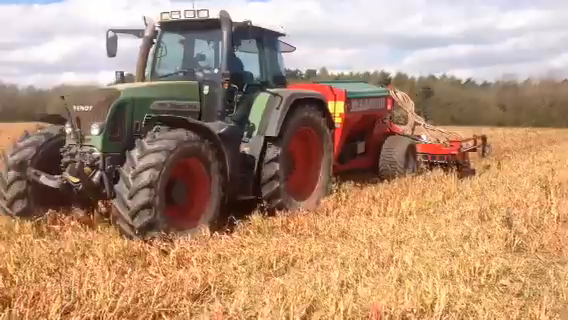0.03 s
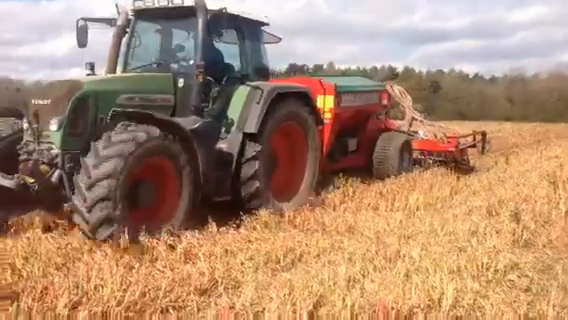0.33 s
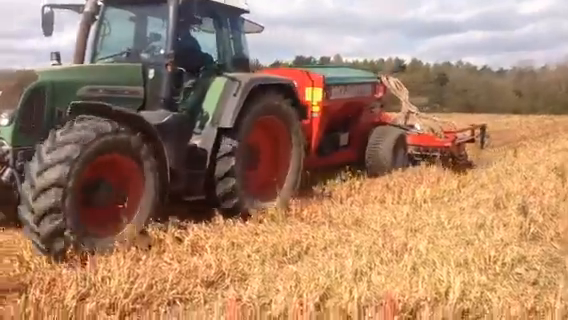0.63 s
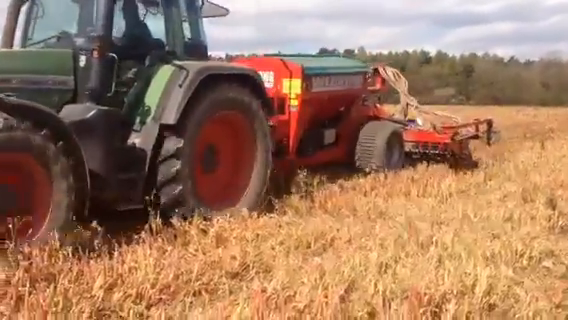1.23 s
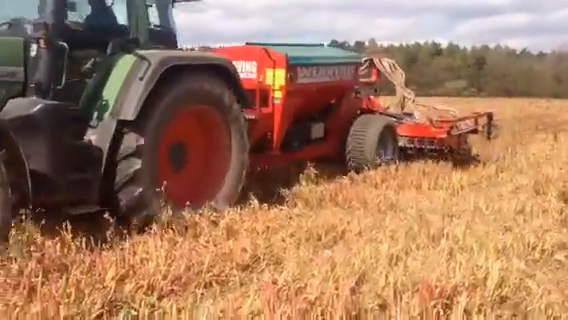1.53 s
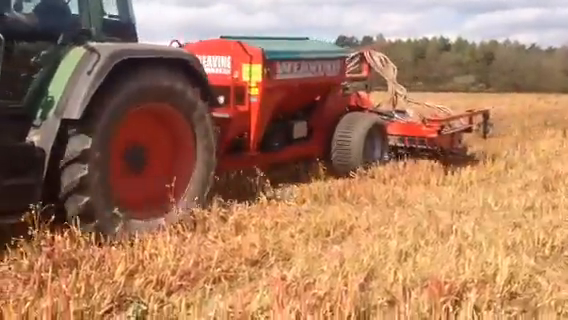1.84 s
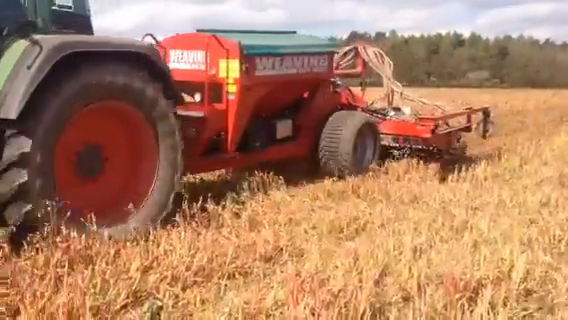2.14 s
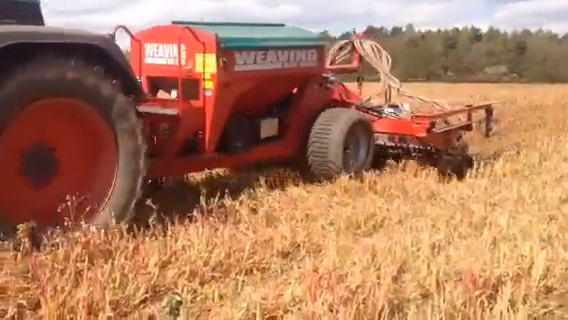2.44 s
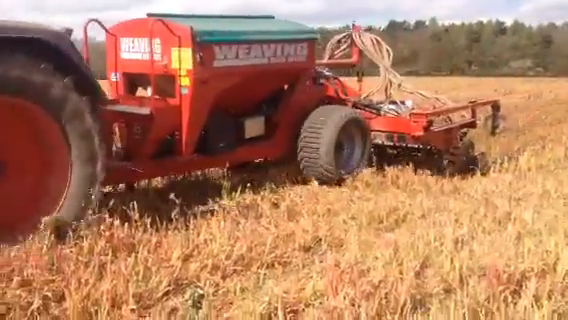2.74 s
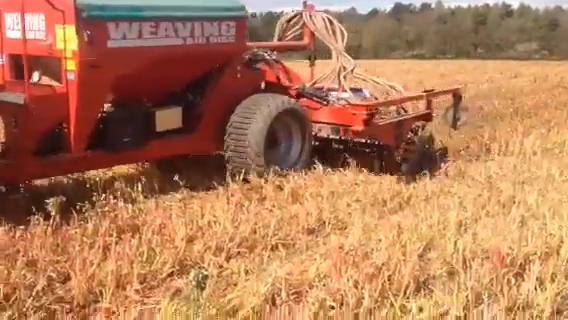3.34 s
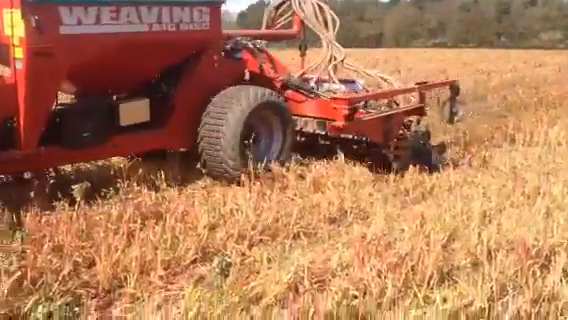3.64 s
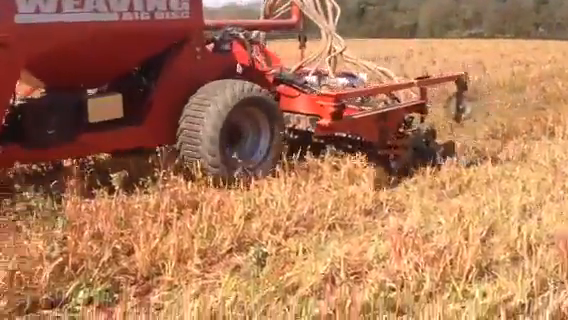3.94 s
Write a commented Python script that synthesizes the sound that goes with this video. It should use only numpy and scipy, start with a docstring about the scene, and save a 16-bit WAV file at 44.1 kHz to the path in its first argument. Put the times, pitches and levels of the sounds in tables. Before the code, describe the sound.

A tractor and seed drill pass close by, engine droning under a growing bright hiss.

```python
"""A bright, grainy hiss grows over a droning, clattering engine: a six-cylinder tractor tows a
pneumatic seed drill close past, through stubble. The hiss is seed blown by the drill's fan through
resonant pipes; the drone is a harmonic series on the engine's firing rate. Straw crackles and snaps,
the wheels rumble, and friction with the soil makes the steel discs sing faintly."""
import sys
import numpy as np
from scipy.fft import rfft, irfft, next_fast_len
from scipy.io import wavfile
from scipy.ndimage import map_coordinates

SR = 44100
rng = np.random.default_rng(int(sys.argv[2]) if len(sys.argv) > 2 else 0)


def dump_mix(stems):
    """Bounce the given channels to the path in sys.argv[1] as a 16-bit WAV at rate SR."""
    frames = np.atleast_2d(stems).T  # one column per channel
    limited = np.clip(frames, -1, 1)  # hard clip at full scale
    pcm = np.round(limited * 32767).astype(np.int16)
    wavfile.write(sys.argv[1], SR, pcm)


N = 176400
TIME_S = np.arange(N) / SR


def amp(db):
    """Decibels to amplitude ratio."""
    return 10 ** (np.asarray(db) / 20)


def unit(x):
    """Normalisation to rms 1."""
    return x / np.sqrt(np.mean(x ** 2) + 1e-20)


def curves(rows):
    """Linear interpolation in time: one curve for each column after the first."""
    times, *columns = np.transpose(rows)
    return [np.interp(TIME_S, times, column) for column in columns]


def noise():
    """Gaussian white noise."""
    return rng.standard_normal(N)


def wobble(knots_per_s):
    """Smooth random modulation: a spline through Gaussian values."""
    return map_coordinates(rng.standard_normal(4096), [TIME_S * knots_per_s + 4], mode="wrap")


def filtered(x, response):
    """Linear filtering: the spectrum is multiplied by a frequency response."""
    size = next_fast_len(N + 8192)
    return irfft(rfft(x, size) * response(np.fft.rfftfreq(size, 1 / SR)), size)[:N]


def coloured(x, spectrum):
    """Spectral shaping by (frequency_hz, gain_db) points, at rms 1."""
    points_hz, gain_db = np.transpose(spectrum)
    return unit(filtered(x, lambda hz: amp(np.interp(np.log(hz + 1), np.log(points_hz), gain_db))))


def grains(hits_per_s, spread_db, share):
    """Shot noise: tiny uneven impacts carry a share of the power of a white hiss."""
    hits = (rng.random(N) < hits_per_s / SR) * np.sign(noise())
    sizes = amp(spread_db * np.clip(noise(), -2, 2))
    return np.sqrt(share) * unit(hits * sizes) + np.sqrt(1 - share) * noise()


def pings(hits_per_s=300, attack_s=.002, decay_s=.035, level_db=-11.5):
    """Damped free vibration: grit and seed ring the steelwork at scattered pitches."""
    t = np.arange(SR // 6) / SR
    envelope = np.exp(-t / decay_s) * (1 - np.exp(-t / attack_s))
    ringing = np.zeros(N + SR)
    for when, pitch, size in rng.random((hits_per_s * N // SR, 3)):
        hz = 900 + 14000 * pitch ** 1.3
        start = int(when * N)
        ringing[start:start + len(t)] += (.5 + size) * envelope * np.sin(2 * np.pi * hz * t)
    return amp(level_db) * unit(ringing[:N])


def singing(pitch_hz, width_hz):
    """A randomly driven mode gives narrowband noise: an unsteady tone of rms 1."""
    envelope = wobble(width_hz) + 1j * wobble(width_hz)
    return unit(np.real(envelope * np.exp(2j * np.pi * pitch_hz * TIME_S)))


# Resonance of the seed pipes: pitch_hz, width_hz, gain_db
PIPE_MODES = [(5182, 686, 0)]
# Broad band around that resonance: frequency_hz, gain_db
PIPE_SPECTRUM = [(1000, -30), (2500, -5), (4000, -1), (5200, -1), (6400, -0.5), (8000, -5.5), (14000, -18)]


def pipe_resonance(x):
    """The pipes act as a damped resonator, favouring a bright band; the result has rms 1."""
    def response(f):
        return sum(amp(db) * 1j * f * width / (hz ** 2 - f ** 2 + 1j * f * width)
                   for hz, width, db in PIPE_MODES)
    return coloured(filtered(x, response), PIPE_SPECTRUM)


# Pipe hiss, growing as the drill nears: time_s, level_db
HISS_LEVEL = [(.1, -25), (.29, -24.2), (.39, -21.8), (.53, -21.8), (.58, -23.4), (.72, -22.4),
              (1.15, -22.4), (1.32, -20.5), (1.44, -20.9), (1.56, -19.3), (1.7, -20.4), (1.87, -20.1),
              (1.94, -17.6), (2.04, -20.3), (2.28, -19.1), (2.55, -18.4), (2.76, -15.7), (2.88, -18.2),
              (3.25, -18.2), (3.37, -16.7), (3.47, -17.8), (3.58, -16.9), (3.76, -18.2), (3.96, -16.7)]


def seed_pipes(surge_db, gain_db=.08, flutter_db=.6):
    """Broadband excitation: rushing air and rattling seed drive the pipe resonance."""
    level_db, = curves(HISS_LEVEL)
    seeds = grains(hits_per_s=3900, spread_db=3.5, share=.49) + pings()
    return amp(level_db + gain_db + surge_db + flutter_db * wobble(70)) * pipe_resonance(seeds)


# Stalks under the drill: time_s, crackle_db, rush_db
STUBBLE_LEVELS = [(0.1, -33.3, -35.7), (.45, -30.8, -35.6), (.62, -31.8, -35.6), (.95, -29.8, -33.8),
                  (1.15, -29.6, -34.2), (1.55, -26.6, -32.9), (1.75, -28.7, -32.9), (2.15, -27.3, -32.4),
                  (2.4, -25.8, -31.5), (2.62, -24, -29.6), (2.95, -26, -30.7), (3.3, -25.2, -30.3),
                  (4, -24.2, -29.8)]
# Treble crackle of dry straw: frequency_hz, gain_db
STRAW_SPECTRUM = [(60, -68), (2000, -16.5), (5000, -1.5), (7000, -1), (8300, -0.5), (9300, 0.5), (10400, 0),
                  (11300, -3), (12300, -4), (13200, -6.5), (14000, -5), (15200, -6)]
# Midrange rush: frequency_hz, gain_db
RUSH_SPECTRUM = [(60, -60), (500, -36), (1200, -5.5), (1500, 0), (2200, 0), (3000, -1), (4000, -0.5),
                 (6000, -24), (12000, -29)]


def stubble(surge_db, crackle_gain_db=1.36, rush_gain_db=-.35):
    """Superposed impulses from many dry stalks merge into a crackle over a broad rush."""
    crackle_db, rush_db = curves(STUBBLE_LEVELS)
    stalks = amp(surge_db) * grains(hits_per_s=3000, spread_db=4, share=.42) + pings()
    crackle = amp(crackle_db + crackle_gain_db) * coloured(stalks, STRAW_SPECTRUM)
    rush = amp(rush_db + rush_gain_db) * coloured(stalks, RUSH_SPECTRUM)
    return crackle + rush


# Single strikes of straw and grit: start_s, peak_db
STRIKES = [(0.4534, -13), (0.5347, -5), (0.604, -5.5), (0.6998, -13), (0.8205, -14), (0.9123, -12),
           (1.3234, -5), (1.5379, -3), (1.8494, -2), (1.9414, -6), (1.9719, -5), (2.6304, -1), (2.772, -3),
           (3.5708, -5.5)]


def snaps(gain_db=-12, t60_s=.025, crack_db=-7):
    """Impact transients: each strike on the drill is a noise burst with exponential decay."""
    envelope = sum((TIME_S >= start_s) * amp(peak_db - 60 * np.abs(TIME_S - start_s) / t60_s)
                   for start_s, peak_db in STRIKES)
    burst = pipe_resonance(noise()) + amp(crack_db) * coloured(noise(), STRAW_SPECTRUM)
    return amp(gain_db) * envelope * burst


# Cylinder firings: time_s, rate_hz
FIRING_RATE = [(0, 81.0), (1, 80.7), (2, 80.5), (4, 80.6)]
# Fundamental at the firing rate: time_s, level_db
THRUM_LEVEL = [(0.1, -57), (1.3, -59), (2.2, -61), (4, -66)]
# Exhaust overtones together: time_s, level_db
DRONE_LEVEL = [(0.1, -37), (.38, -33), (.95, -36.5), (1.6, -34), (1.92, -35.5), (2.12, -31.5), (2.4, -29.5),
               (2.7, -32.5), (3.15, -35.5), (3.45, -42), (4, -44)]
# Exhaust overtones: firing_multiple, level_db
EXHAUST_HARMONICS = [(2, -13), (3, 1.5), (4, -18), (6, -15)]
# Engine noise: time_s, roar_db, clatter_db
ENGINE_LEVELS = [(0.1, -37, -35), (.85, -37.5, -35.5), (1.3, -35.5, -33.5), (1.85, -35, -32.5),
                 (2.2, -37, -31.5), (2.8, -35.5, -32.5), (3.4, -35.5, -31.5), (4, -36, -32.5)]
# Low engine roar: frequency_hz, gain_db
ROAR_SPECTRUM = [(40, -65), (100, -37), (180, -14), (275, -2), (320, -3), (380, -5), (420, -16.5),
                 (600, -14.5), (1500, -45)]
# Midrange engine clatter: frequency_hz, gain_db
CLATTER_SPECTRUM = [(60, -65), (250, -38), (450, -6), (560, -2), (680, 1), (950, -2.5), (1100, -4.5),
                    (1300, -10.5), (2500, -16), (6000, -46)]


def engine(drone_gain_db=-1, clatter_gain_db=.5, throb_db=.6, flutter_db=1.35, waver_rad=.1):
    """Periodic firing makes exhaust harmonics and modulates the amplitude of roar and clatter."""
    firing_hz, = curves(FIRING_RATE)
    thrum_db, = curves(THRUM_LEVEL)
    drone_db, = curves(DRONE_LEVEL)
    roar_db, clatter_db = curves(ENGINE_LEVELS)
    phase = 2 * np.pi * np.cumsum(firing_hz) / SR
    harmonics = np.zeros(N)
    for multiple, level_db in EXHAUST_HARMONICS:
        gain = amp(level_db + flutter_db * wobble(14))
        offset = waver_rad * wobble(22) + 2 * np.pi * rng.random()
        harmonics += gain * np.sin(multiple * phase + offset)
    thrum = amp(thrum_db) * np.sin(phase)
    drone = amp(drone_db + drone_gain_db) * unit(harmonics)
    throb = amp(throb_db * np.cos(phase))
    roar = amp(roar_db) * coloured(noise() * throb, ROAR_SPECTRUM)
    clatter = amp(clatter_db + clatter_gain_db) * coloured(noise() * throb, CLATTER_SPECTRUM)
    return thrum + drone + roar + clatter


# Rolling wheels: time_s, level_db
RUMBLE_LEVEL = [(0.1, -37.5), (.8, -36.5), (1.1, -38.5), (1.6, -37.5), (2.3, -35.5), (2.8, -34.5),
                (3.4, -34.5), (3.65, -30), (4, -33.5)]
# Rumble of tyres and frame: frequency_hz, gain_db
RUMBLE_SPECTRUM = [(25, -55), (60, -31), (90, -25), (110, -15), (130, -4.5), (160, 0), (215, 1.5),
                   (260, -4), (400, -26), (900, -60)]


def wheels(gain_db=1):
    """Rolling noise: the ground shakes tyres and frame at low frequencies."""
    level_db, = curves(RUMBLE_LEVEL)
    return amp(level_db + gain_db) * coloured(noise(), RUMBLE_SPECTRUM)


# Natural modes of the steel discs: pitch_hz, width_hz, gain_db
DISC_MODES = [(945, 10, -10), (1998, 8, -6), (4883, 30, 5.5), (6648, 40, 0), (8682, 34, -3),
              (10996, 40, -6.5), (13515, 45, -13)]
# Ringing of the discs in the soil: time_s, level_db
DISC_LEVEL = [(.1, -48.5), (1.2, -47.5), (1.9, -47), (2.6, -43.5), (3.2, -45.5), (4, -46.5)]


def discs(swell_db=.5):
    """Friction with the soil excites the disc modes; each swells and fades on its own."""
    level_db, = curves(DISC_LEVEL)
    modes = sum(amp(db) * unit(amp(swell_db * wobble(4)) * singing(hz, width))
                for hz, width, db in DISC_MODES)
    return amp(level_db) * modes


# Brief squeals of a disc: centre_s, length_s, pitch_hz, level_db
DISC_SQUEALS = [(1.25, .14, 9910, -44), (1.32, .3, 8680, -42.5), (1.92, .25, 943, -43),
                (2.33, .2, 13510, -48), (2.45, .16, 8680, -38.5), (2.69, .12, 8685, -36),
                (2.68, .2, 3470, -39), (2.72, .12, 4880, -29), (2.92, .14, 3397, -38),
                (3.35, .2, 4890, -33), (3.78, .12, 9205, -41)]


def squeals(waver_rad=.35, flutter_db=3.5):
    """Friction-induced oscillation: now and then one mode catches and sings out."""
    sound = np.zeros(N)
    for centre_s, length_s, pitch_hz, level_db in DISC_SQUEALS:
        envelope = amp(level_db) * np.exp(-2 * ((TIME_S - centre_s) / length_s) ** 2)
        tone = np.sqrt(2) * np.sin(2 * np.pi * pitch_hz * TIME_S + waver_rad * wobble(60))
        sound += envelope * tone * amp(flutter_db * wobble(30))
    return sound


# Exhaust boom, strongest while the engine faces the listener: time_s, level_db
BOOM_LEVEL = [(.1, -47), (.45, -46), (.85, -45), (1.25, -40.5), (1.95, -41.5), (2.2, -54), (4, -52)]


def exhaust_boom(pitch_hz=374, width_hz=26):
    """A narrow resonance of the exhaust gives a hollow boom."""
    level_db, = curves(BOOM_LEVEL)
    return amp(level_db) * singing(pitch_hz, width_hz)


def scene():
    """Superposition of tractor and drill, the same in both channels."""
    surge_db = .72 * wobble(55)  # hiss and crackle flicker together
    tractor = engine() + exhaust_boom() + wheels()
    drill = seed_pipes(surge_db) + stubble(surge_db) + snaps() + discs() + squeals()
    return np.array([drill + tractor] * 2)


def record(dry, start_s=.083, rise_s=.002, cutoff_hz=15300):
    """Gating and band limiting: the sound cuts in, and a steep low-pass removes the top treble."""
    gate = np.clip((TIME_S - start_s) / rise_s, 0, 1)
    return np.array([filtered(channel * gate, lambda hz: 1 / (1 + (hz / cutoff_hz) ** 300))
                     for channel in dry])


dry = scene()
out = record(dry)
dump_mix(out)
```